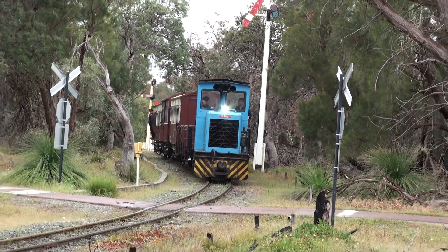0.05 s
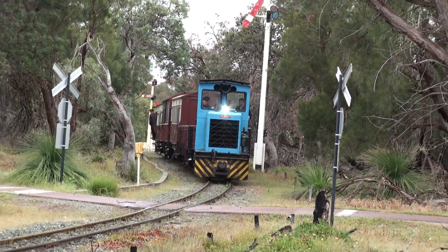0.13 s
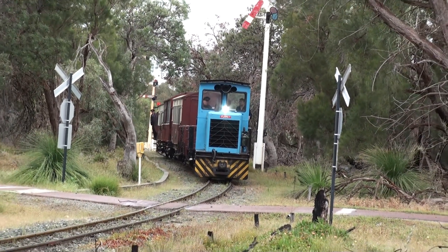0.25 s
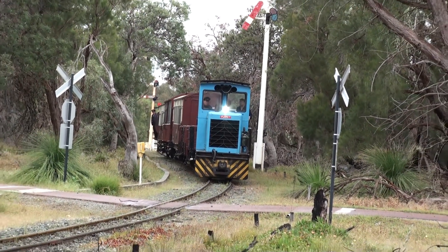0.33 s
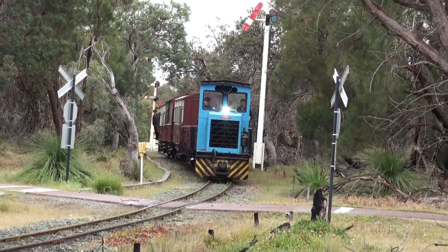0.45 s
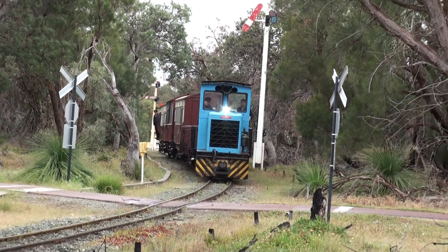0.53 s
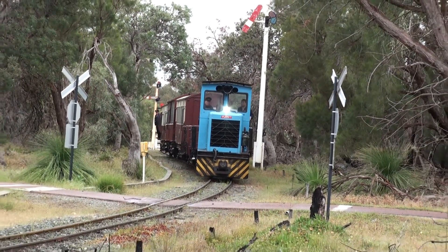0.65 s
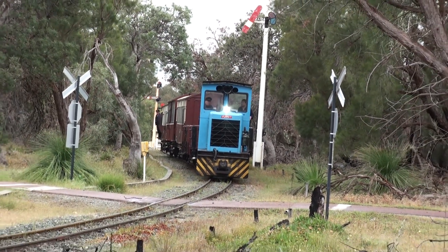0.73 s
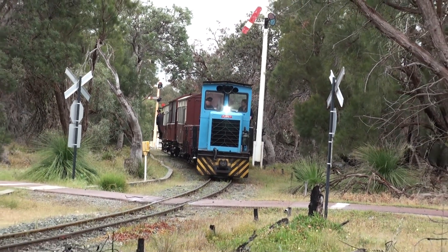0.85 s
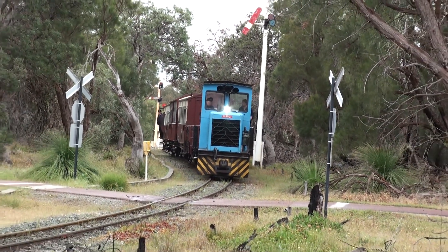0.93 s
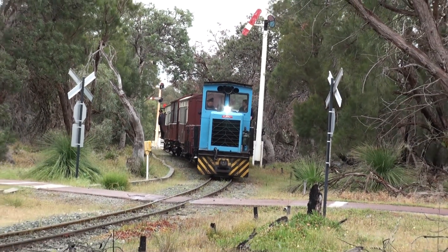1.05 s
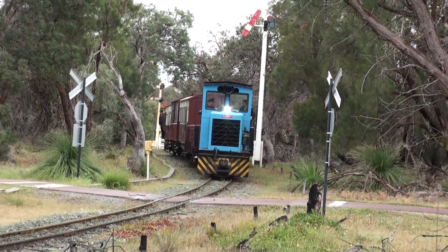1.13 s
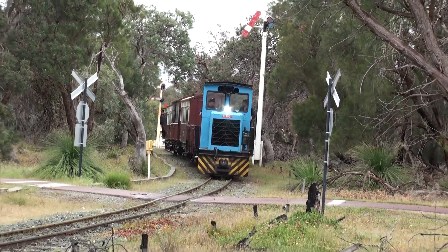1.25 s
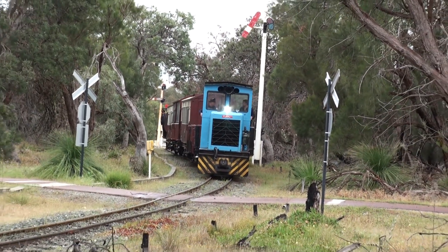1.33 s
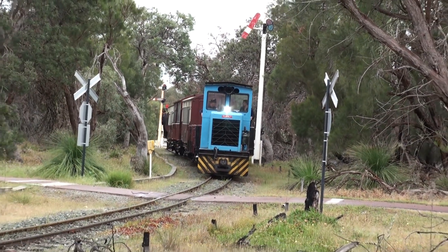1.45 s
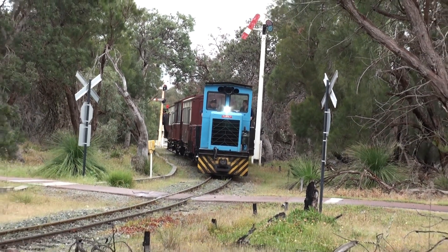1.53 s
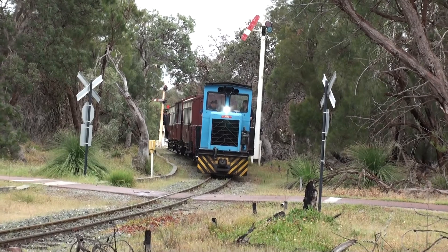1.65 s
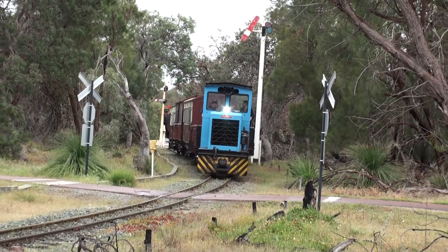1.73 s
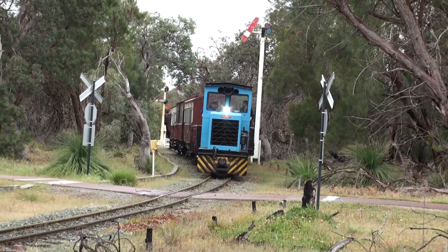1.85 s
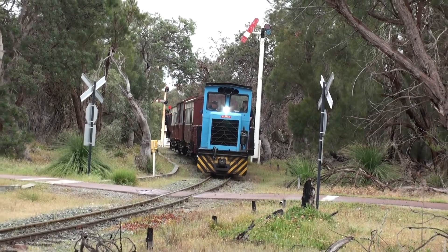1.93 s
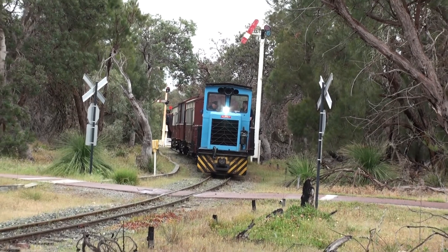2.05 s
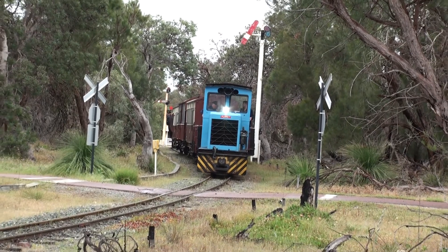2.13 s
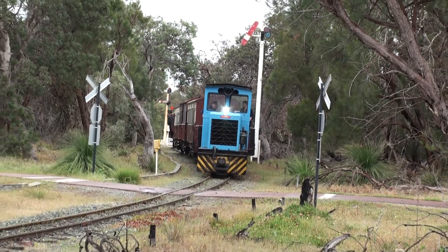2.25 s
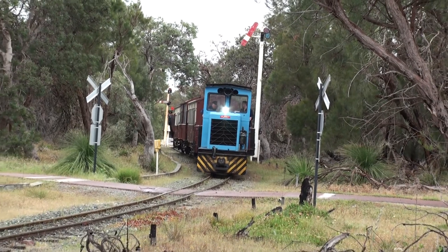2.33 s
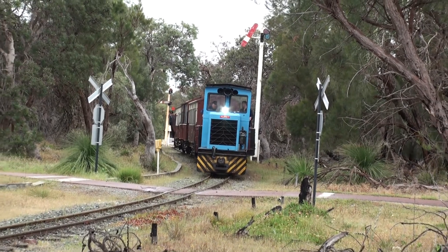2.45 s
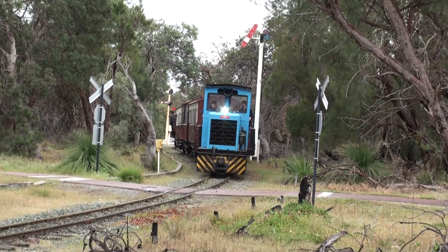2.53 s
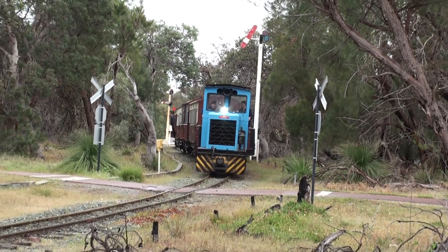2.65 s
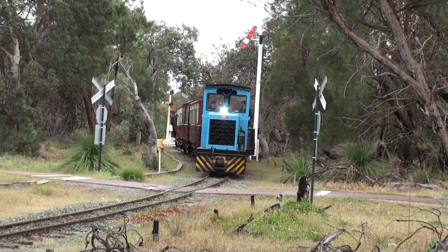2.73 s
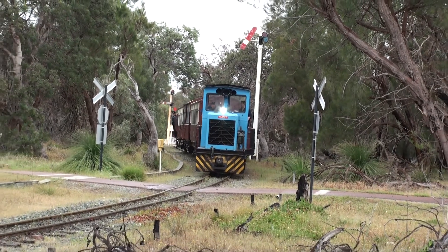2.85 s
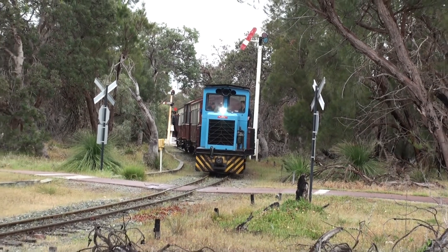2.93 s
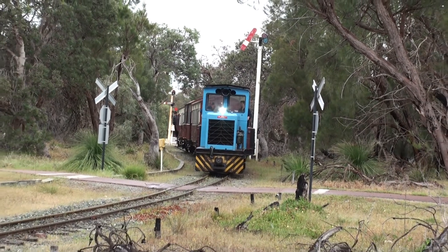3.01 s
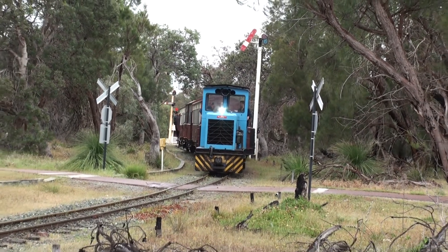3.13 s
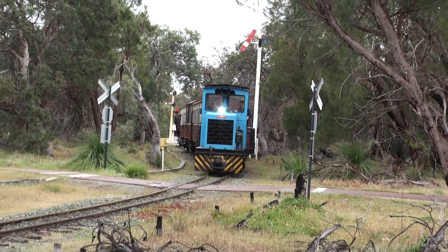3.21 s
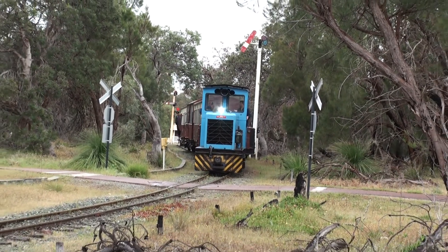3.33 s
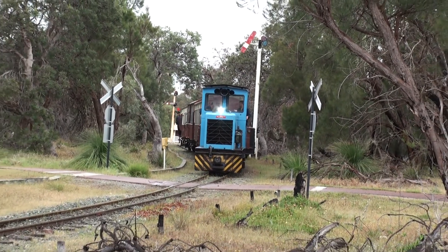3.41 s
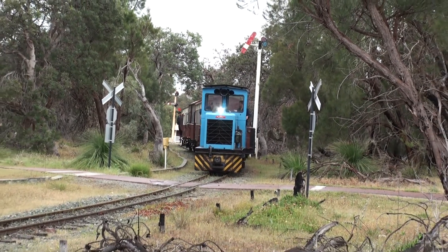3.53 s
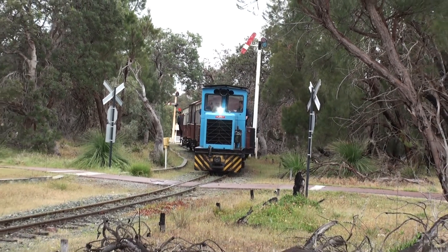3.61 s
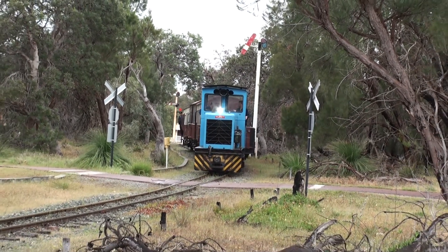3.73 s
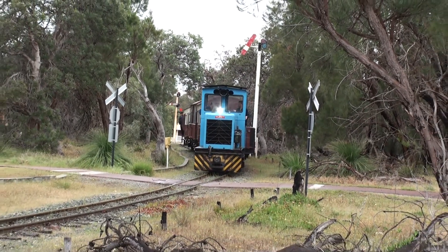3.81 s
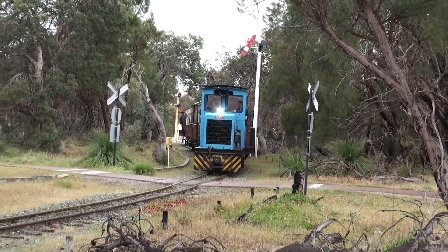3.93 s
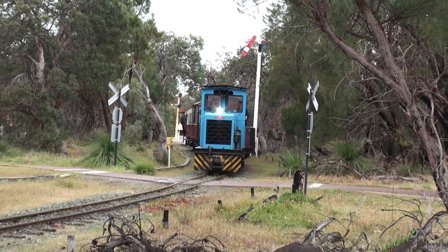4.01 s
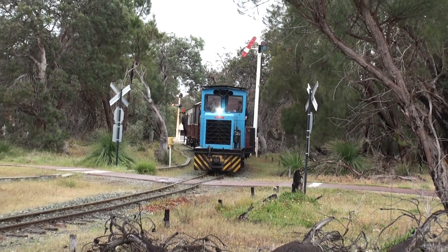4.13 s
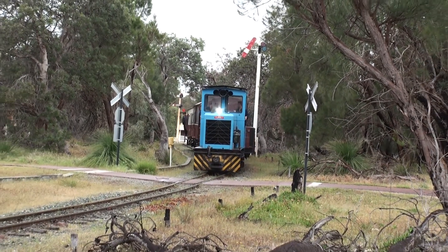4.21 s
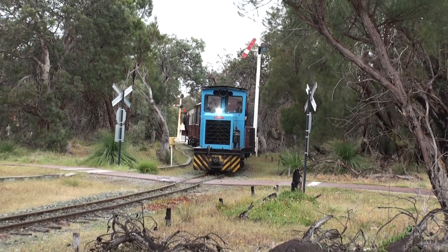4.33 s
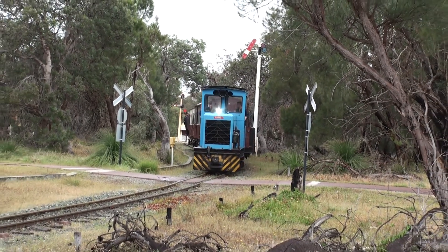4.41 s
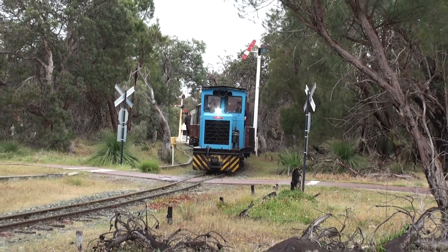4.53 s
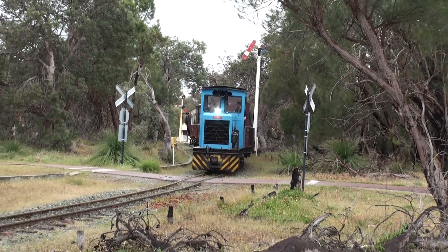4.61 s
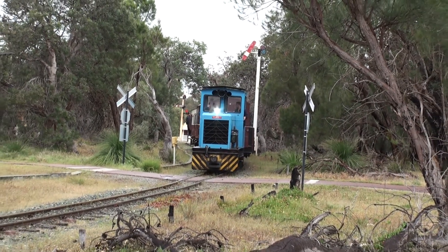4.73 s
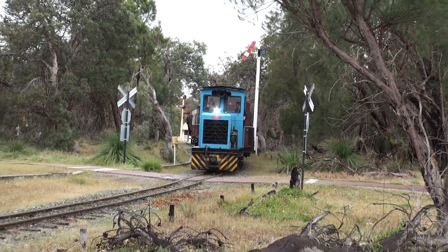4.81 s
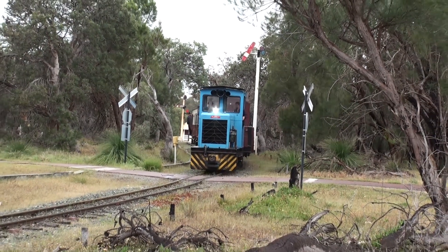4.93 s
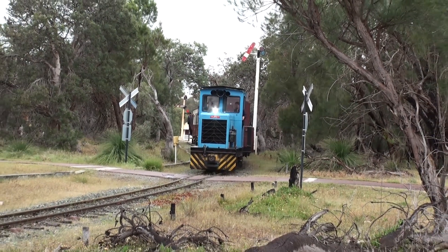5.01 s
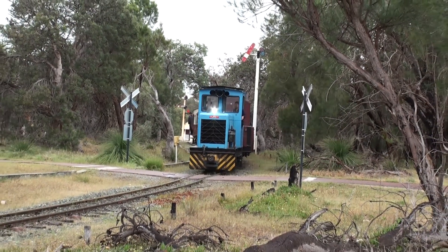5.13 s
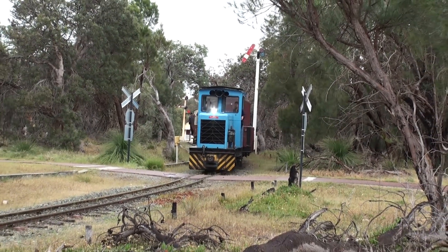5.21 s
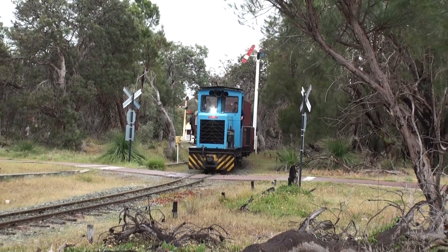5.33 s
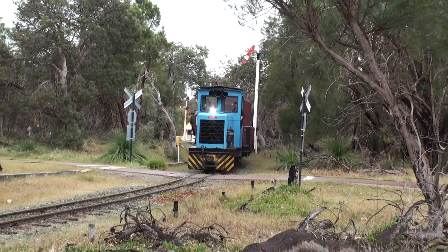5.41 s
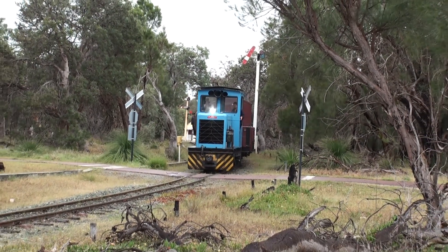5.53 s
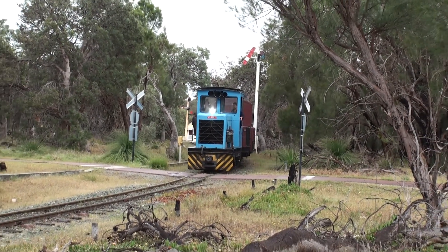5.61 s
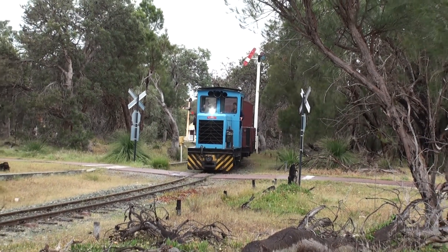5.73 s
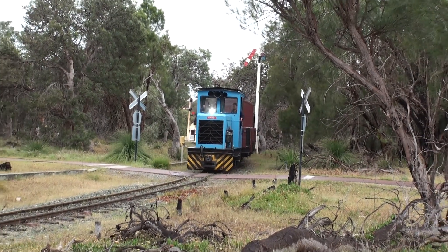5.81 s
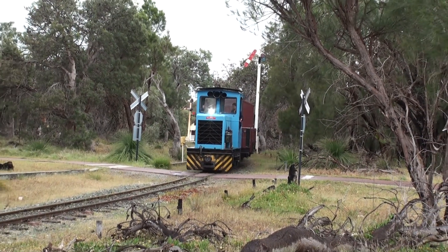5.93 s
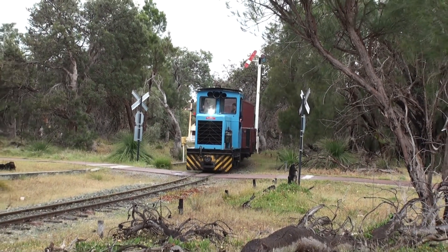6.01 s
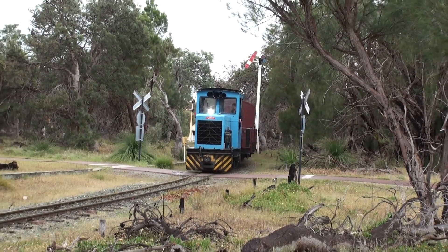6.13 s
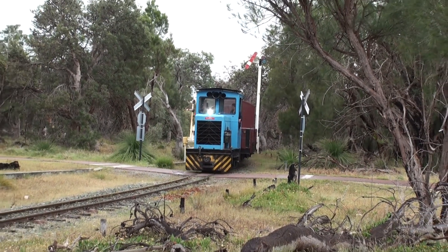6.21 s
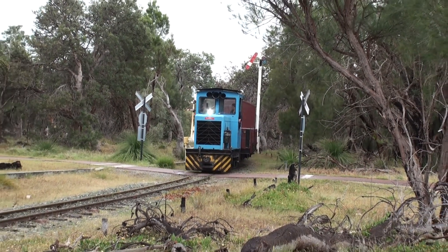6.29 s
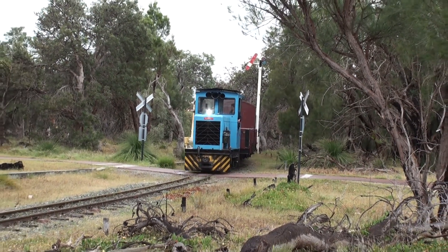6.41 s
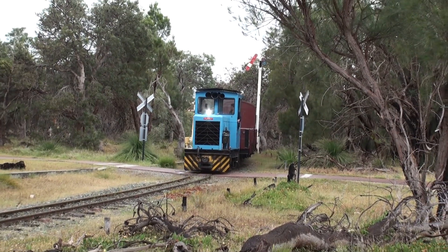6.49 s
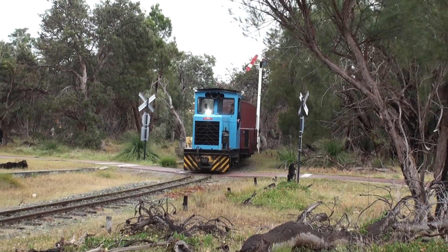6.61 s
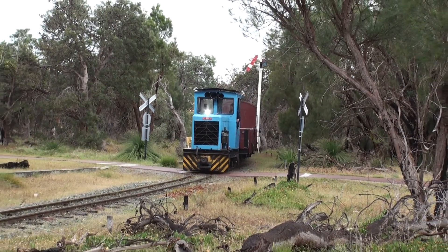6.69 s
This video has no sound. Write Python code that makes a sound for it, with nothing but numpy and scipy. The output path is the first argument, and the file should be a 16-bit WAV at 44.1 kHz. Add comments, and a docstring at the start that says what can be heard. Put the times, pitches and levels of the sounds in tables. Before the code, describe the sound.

The tail of a blaring locomotive horn chord stops and rings through woodland, leaving a low diesel hum, roar and hiss gradually rising, dotted with dry clicks.

```python
"""Diesel locomotive and air horn among trees

A small six-cylinder diesel rolls towards a level crossing: a drone of exhaust orders, with noise for rumble,
roar and hiss. Its four-trumpet air horn, summed from overtones, is already blowing, stops, and echoes off
the trees. The camera's gain control, knocked down by the blast, creeps back, so drone, roar, hiss, dry ticks
(filtered clicks) and thin squeaks (short sine chirps) swell steadily."""
import sys
import numpy as np
from scipy import signal
from scipy.fft import rfft, irfft, next_fast_len
from scipy.io import wavfile
from scipy.ndimage import uniform_filter1d

SR = 44100
rng = np.random.default_rng(int(sys.argv[2]) if len(sys.argv) > 2 else 0)


def to_wav(sig):
    """Store sig (one row per channel, or 1-D mono) as 16-bit WAV at the path in sys.argv[1].

    Samples outside -1..1 are clipped; the rate is SR.
    """
    pcm = np.clip(np.atleast_2d(sig), -1, 1) * 32767
    pcm = np.round(pcm).astype(np.int16)
    wavfile.write(sys.argv[1], SR, pcm.T)  # frames by channels


def volts_from_decibels(level):
    """Turn decibel levels (scalar or array-like) into linear amplitude factors."""
    exponent = np.asarray(level, float) / 20
    return 10 ** exponent


N = 298116

# phase lead of the left microphone port over the right: pitch_hz, lead_rad
LEAD = [(50, -.35), (99, -.28), (150, -.6), (300, -.8), (450, -.55), (900, -.75), (1200, -.47),
        (1870, -.07), (2200, -.26), (3400, -.05), (6000, 0.0), (7800, .4), (9000, -.07), (11800, 0.0)]


def evened(x):
    """Scales to rms 1."""
    return x / np.sqrt(np.mean(x ** 2) + 1e-20)


def read(points, hz):
    """Reads a table on a log-frequency axis."""
    f, value = np.transpose(points)
    return np.interp(np.log(hz + 1), np.log(f + 1), value)


def track(rows, t):
    """Reads the columns of a time table at times t."""
    s, *columns = np.transpose(rows)
    return [np.interp(t, s, c) for c in columns]


def drift(hz, size=N):
    """Slow chance up to about hz (at most 300), rms 1, drawn every 64 samples."""
    lowpass = signal.butter(2, min(hz, 300), fs=SR / 64, output="sos")
    slow = signal.sosfilt(lowpass, rng.standard_normal(size // 64 + 700))[698:]  # past the filter's start
    return np.interp(np.arange(size) / 64, np.arange(len(slow)), evened(slow))


def noise(far, near, patchy_db, size, ringing=()):
    """Two-channel noise, rms 1, whose colour moves from far to near, with drifting patches."""
    # likeness of left and right: pitch_hz, likeness (1 = identical)
    likeness = [(60, 1), (300, 1), (400, 0.86), (550, 0.9), (950, 0.95), (1900, 0.96), (2200, 0.93),
                (4500, 0.98), (7000, 0.96), (8000, 0.75), (9500, 0.91), (11800, 0.99)]
    hop = size // 4
    frames, hz = N // hop + 5, np.fft.rfftfreq(size, 1 / SR)
    a, b, c, d, patches = rng.standard_normal((frames, len(hz), 5)).T
    patches = uniform_filter1d(patches, size=size // 128, axis=0)
    patches = evened(uniform_filter1d(patches, size=3000 // hop + 2, axis=1))
    same = np.clip(read(likeness, hz), -1, 1)[:, None]
    left, other = a + 1j * b, c + 1j * d
    z = np.array([left, same * left + np.sqrt(1 - same ** 2) * other])

    far_colour, near_colour = [volts_from_decibels(read(p, hz)) / np.linalg.norm(volts_from_decibels(read(p, hz))) for p in (far, near)]
    nearness = np.clip((np.arange(frames) * hop / SR - 2.2) / 4.64, 0, 1)  # the approach starts at 2.2 s
    z *= far_colour[:, None] ** (1 - nearness) * near_colour[:, None] ** nearness
    z *= volts_from_decibels(patchy_db * patches)
    ring_db = sum(db / (1 + (2 * (hz - f) / width) ** 2) for f, width, db in ringing) + 0 * hz
    z *= volts_from_decibels(ring_db)[:, None]
    return evened(signal.istft(z, nperseg=size, noverlap=size - hop)[1][:, :N])


def engine():
    """Exhaust orders of the four-stroke cycle over low rumble, and roar and hiss that throb with the firing."""
    # exhaust note; six cylinders fire on every sixth order of the cycle: order, level_db
    exhaust = [(4, -28), (6, -9), (9, -26), (10, -19), (11, -14), (12, 0), (13, -18), (14, -20), (15, -25),
               (16, -21), (17, -29), (18, -8), (19, -14), (20, -23), (21, -11), (22, -19), (23, -17),
               (24, -27), (25, -29), (27, -23), (28, -18), (29, -21), (30, -24), (32, -27), (33, -27),
               (34, -18), (35, -28), (36, -29), (37, -27), (38, -20), (39, -20), (42, -30), (60, -27)]
    # a belt-driven fan sings between the orders: order, level_db
    fan = [(39.5, -12.5), (59.25, -29)]
    # engine speed and levels: time_s, twelfth_order_hz, note_db, roar_db
    speed = [(0, 99.5, -17.5, -22.5), (.65, 99.5, -20, -25), (1.05, 99.5, -21, -22),
             (1.65, 99.07, -21.5, -23), (2.55, 99.09, -22, -23), (3.45, 98.77, -22, -23),
             (4.05, 99.2, -21.5, -23), (4.65, 99.33, -21, -23), (5.55, 99.76, -21.5, -23),
             (5.9, 99.23, -21, -23), (6.2, 98.4, -22.5, -23.2), (6.62, 97.35, -21.8, -22),
             (6.76, 98.0, -21, -22)]
    # the exhaust swings aside: time_s, factor on the left-right lead
    bearing = [(0, 1.2), (.85, 0.11), (3, 0.52), (5.3, 1.8), (6.76, 1.6)]
    # relative colour of the low rumble: pitch_hz, density_db_per_hz
    rumble_colour = [(20, -45), (32, -26), (60, -39), (95, -13.5), (150, -11.5), (240, -13), (300, -15.5),
                     (340, -19), (400, -32.5), (520, -59)]
    # casing roar, notched by the ground echo, from far and from near: pitch_hz, density_db_per_hz
    roar_far = [(200, -52), (340, -13.5), (350, -12), (398, -14.5), (471, -13), (515, -8.5), (672, -2.5),
                (756, -2.5), (904, -1), (1090, -8.5), (1240, -0.5), (1820, -10.5), (2110, -10), (2290, -12),
                (3600, -22.5), (4680, -57), (7920, -120)]
    roar_near = [(200, -35), (340, -5), (357, -24), (398, -17.5), (552, -3.5), (779, -2.5), (959, 1),
                 (1130, -8.5), (1380, -2), (1680, -14), (2130, -15.5), (2330, -17.5), (2950, -20.5),
                 (3200, -27.5), (3600, -19.5), (4680, -43), (7920, -120)]
    # relative colour of the hiss: pitch_hz, density_db_per_hz
    hiss_colour = [(2000, -47), (3000, 1), (3220, -13), (3700, -3), (4280, -1), (4650, -4), (5610, -2.5),
                   (5890, -7.5), (6360, -2.5), (7010, -7.5), (7990, -9), (11000, -13), (12300, -21),
                   (13200, -24), (14300, -23), (16000, -32)]
    # narrow ringing of the casing: pitch_hz, width_hz, lift_db
    casing = [(2105, 23, 8), (2560, 56, 4.5), (2760, 39, 3), (5900, 140, -0.5), (7050, 190, 6),
              (11860, 290, 11.5)]

    t = np.arange(N) / SR
    hz, note_db, roar_db = track(speed, t)
    hiss_db = -33 - 0.51 * t  # the treble dims as the body turns side-on
    cycle = 2 * np.pi * np.cumsum(hz / 12) / SR
    aside = (track(bearing, t)[0] - 1) / 2 * np.array([[1], [-1]])

    note = np.zeros((2, N))
    orders = exhaust + fan
    for (k, db), chance in zip(orders, rng.random(len(orders))):
        # firing orders lock into one pulse smeared by the pipe; the rest come from unequal cylinders
        phase = .52 * (k / 6) ** 2 if k % 6 == 0 else 2 * np.pi * chance
        if k in (11, 13):  # uneven firing times: these wobble the main hum in pitch, not in level
            phase = .52 * 4 + np.pi / 2
        waver_db = (.02 * k + .4) * drift(5.0)  # uneven burning from cycle to cycle
        lead = aside * read(LEAD, k * hz[0] / 12)
        note += volts_from_decibels(db + waver_db) * np.sqrt(2) * np.cos(k * cycle + phase + lead)

    firing = np.cos(6 * cycle)
    crank = np.cos(2 * cycle) + np.cos(3 * cycle)
    roar_db = roar_db + 0.16 * firing + 0.1 * crank + 0.73 * drift(30.0)
    hiss_db = hiss_db + 0.54 * firing + .5 * crank + 0.39 * drift(62.6)
    rumble = volts_from_decibels(note_db - 8.5) * noise(rumble_colour, rumble_colour, 1.5, 4096, casing)
    roar = volts_from_decibels(roar_db) * noise(roar_far, roar_near, 0.58, 1024, casing)
    hiss = volts_from_decibels(hiss_db) * noise(hiss_colour, hiss_colour, 0.45, 512, casing)
    return (volts_from_decibels(note_db) * note + rumble + roar + hiss) * volts_from_decibels(-0.8 * aside)


def horn():
    """Four reed trumpets on one air valve, with rushing air, heard directly and off the trees."""
    # pitch of each trumpet while the air lasts: pitch_hz
    trumpet_hz = [258.4, 313.85, 374.55, 538.0]
    # one list for each trumpet: multiple, level_db
    trumpet_overtones = [
        [(1, -29.5), (2, -35.5), (3, -28.5), (4, -30.5), (5, -26.5), (6, -31), (7, -31.5), (8, -30), (9, -45),
         (10, -42), (11, -37), (12, -53), (13, -55), (14, -45), (15, -42), (16, -44), (17, -50), (18, -61),
         (19, -53), (20, -64)],
        [(1, -23.5), (2, -31.5), (3, -25.5), (4, -24.5), (5, -27.5), (6, -42), (7, -21.5), (8, -35), (9, -43),
         (10, -42), (11, -38), (12, -41), (13, -46), (14, -47), (15, -56), (16, -58), (17, -63), (18, -57),
         (19, -65), (20, -61), (21, -63), (22, -55)],
        [(1, -32), (2, -28), (3, -34), (4, -24), (5, -22.5), (6, -40), (7, -52), (8, -33), (9, -37),
         (10, -40.5), (11, -51), (12, -61), (13, -53), (14, -65), (15, -54), (16, -65), (17, -53), (18, -56),
         (19, -59), (20, -53)],
        [(1, -24), (2, -32), (3, -40), (4, -30), (5, -43), (6, -40), (7, -62), (8, -51), (9, -60), (10, -68),
         (11, -67), (12, -54), (13, -63)],
    ]
    # colour of the sum tones: pitch_hz, level_db
    sum_tones = [(700, -39), (840, -37), (1150, -43), (1460, -35), (1780, -38), (2100, -37), (2450, -44),
                 (2730, -42), (3400, -50)]
    # relative colour of the rushing air: pitch_hz, density_db_per_hz
    air_colour = [(120, -32), (200, -12.5), (310, -10), (454, -14), (534, -4), (677, -10), (755, -8),
                  (1540, -3), (1710, -11.5), (2210, 1.5), (2380, -6), (10000, -29.5), (15500, -46)]
    difference_db = -4  # difference tones against the same colour

    t = np.arange(-SR, SR) / SR  # the blast began earlier, so the echoes are already full
    blow_db = blowing(t)
    slack = np.clip(1 - 4.1 * (t - 0.6), .5, 1)  # the reeds go flat once the air is nearly gone
    turns = []
    for hz in trumpet_hz:
        wavering_hz = hz * slack * (1 + 0.00036 * drift(16.0, size=len(t)))
        turns.append(2 * np.pi * (np.cumsum(wavering_hz) / SR + rng.random()))

    chord = np.zeros(len(t))
    ring_db = blowing(t - .03) - blow_db  # the long bells hold their lowest note a little longer
    for turn, overtones in zip(turns, trumpet_overtones):
        for k, db in overtones:
            level_db = db + ring_db * (k == 1) + 1.03 * drift(10.6, size=len(t))
            chord += volts_from_decibels(level_db) * np.cos(k * turn + .3 * k * k)
    # the second trumpet is shaken by its neighbours' tones near 530 Hz
    shakes = ((2 * turns[0], 2 * trumpet_hz[0]), (turns[3], trumpet_hz[3]))
    for k in range(1, 10):
        second_hz = k * trumpet_hz[1]
        for shake, hz in shakes:
            chord += volts_from_decibels(read(sum_tones, second_hz + hz)) * np.cos(k * turns[1] + shake)
            if k > 3:
                level_db = read(sum_tones, second_hz - hz) + difference_db
                chord += volts_from_decibels(level_db) * np.cos(k * turns[1] - shake + k)
    chord *= np.sqrt(2) * volts_from_decibels(blow_db)

    now = np.arange(N) / SR
    rasp_db = 5.0 * np.exp(-((now - .53) / .02) ** 2)  # the reeds rattle as the valve shuts
    air = volts_from_decibels(-21.5 + blowing(now) + rasp_db) * noise(air_colour, air_colour, 2.0, 1024)
    # half a second of air, mirrored and then forwards, fills the second before the start
    long_air = np.concatenate([air[0, SR // 2::-1], air[0, 1:SR // 2], air[0, :SR]])
    out = np.zeros((2, N + SR))
    out[:, :len(t)] += chord
    echoes = trees(volts_from_decibels(-1.5) * chord + volts_from_decibels(3.0) * long_air)
    out[:, :echoes.shape[1]] += echoes
    return out[:, SR:] + air


def blowing(t):
    """Blowing pressure in dB: sags as the air tank empties, then collapses as the valve shuts."""
    shut_s, knee_s = 0.53, 0.0071
    sag_db = 6 * np.clip(t, 0, shut_s)
    release_db = 490.0 * knee_s * np.logaddexp(0, (t - shut_s) / knee_s)  # settles to 490 dB per s
    return 33 - sag_db - release_db


def trees(x):
    """Sparse echoes of random sign: a quick answer from near trunks and cars, a long faint one from far trunks."""
    # decay of the far trunks: pitch_hz, t60_s
    far_t60 = [(250, 0.87), (320, 0.69), (375, 4.44), (450, 0.78), (540, 2.35), (630, 2.7), (1000, 2.1),
               (2000, 1.06), (4000, 1.08), (9000, 0.41)]
    near_t60_s, near_db, far_db = 0.23, -19, -25.5
    taps = np.zeros((2, 2 * SR))
    at = np.arange(900, 2 * SR - 20, 20) + rng.integers(0, 20, (2, (2 * SR - 901) // 20))
    np.put_along_axis(taps, at, rng.choice([-1., 1.], at.shape), 1)
    taps[1] = 0.54 * taps[0] + 0.5 * taps[1]  # the sides share part of their echoes

    hz, t, z = signal.stft(taps, SR, nperseg=2048)
    fade = volts_from_decibels(-60 * t / np.maximum(read(far_t60, hz), .05)[:, None])
    far = signal.istft(z * fade, SR, nperseg=2048)[1][:, :2 * SR]
    near = taps * volts_from_decibels(-np.arange(2 * SR) / SR * 60 / near_t60_s)
    near = signal.sosfilt(signal.butter(1, 1800, fs=SR, output="sos"), near)  # leaves soak up the treble
    tail = volts_from_decibels(far_db) * far / np.linalg.norm(far[0]) + volts_from_decibels(near_db) * near / np.linalg.norm(near[0])
    return signal.fftconvolve(x[None], tail, axes=1)


def ticks():
    """Short bright snaps: placed ones over a sparse random scatter."""
    # dry ticks: start_s, peak_db, left_over_right_db, low_edge_hz
    placed = [(1.269, -7, 2, 1820), (1.6013, -14, -2.0, 1800), (2.2807, -16, -4, 1800),
              (2.7465, -14.5, -0.5, 1800), (2.8838, -18, -1.5, 1800), (3.8764, -21, -1.0, 1800),
              (4.0261, -10.5, -6, 1800), (4.8124, -16, 0.0, 1800), (5.9294, -23, -1.0, 1800),
              (5.9945, -12, -6, 3600), (6.0284, -23, -0.5, 1800), (6.639, -14, 2, 1800)]
    size = volts_from_decibels(-32.0 + 4.0 * np.minimum(rng.exponential(1, N), 4))
    struck = rng.random(N) < 12.0 / SR  # about 12 per second
    scatter = signal.oaconvolve(size * struck, snap(1800.0))[:N]
    out = np.array([scatter, scatter])
    for s, db, pan_db, low_hz in placed:
        sides = volts_from_decibels(np.array([[db + pan_db / 2], [db - pan_db / 2]]))
        out[:, round(s * SR):][:, :300] += sides * snap(low_hz)
    return out


def snap(low_hz):
    """One sharp crack with a millisecond of rattle, band-passed and scaled to peak 1."""
    t = np.arange(300) / SR
    band = signal.butter(1, [low_hz, 2.8 * low_hz], "bandpass", fs=SR, output="sos")
    rattle = 0.34 * rng.standard_normal(len(t)) * np.exp(-t / 0.0013)
    crack = signal.sosfilt(band, (t == 0) + rattle)
    return crack / abs(crack).max()


def squeaks():
    """Brief high chirps, roughened in pitch, that start sharply, sag and fade."""
    # thin squeaks: start_s, level_db, pitch_hz
    chirps = [(2.0502, -39.5, 10700), (3.1158, -42, 11000), (3.635, -35, 10900), (4.7496, -38, 10400),
              (5.177, -40, 10500), (5.446, -38, 10200), (6.228, -35, 10200)]
    out = np.zeros(N)
    for s, db, hz in chirps:
        u = np.linspace(0, 1, round(0.034 * SR))  # each lasts 34 ms
        turns = np.cumsum(hz * (1.005 - .012 * u + .03 * rng.standard_normal(len(u)))) / SR
        shape = np.minimum(u / 0.087, 1) * np.exp(-1.5 * u) * np.minimum((1 - u) / .1, 1)
        out[round(s * SR):][:len(u)] += volts_from_decibels(db) * shape * np.sin(2 * np.pi * turns)
    return out


def scene():
    """All sources, two channels."""
    return engine() + horn() + ticks() + squeaks()


def held_excess(x, from_db, most_db, recovery_db_per_s):
    """How far the level of x exceeds from_db, caught at once and let go at a steady rate."""
    power_db = 10 * np.log10(abs(uniform_filter1d((x ** 2).mean(0), size=1800)) + 1e-12)
    fall = np.arange(N) * recovery_db_per_s / SR
    over_db = np.maximum.accumulate(np.minimum(power_db - from_db, most_db) + fall) - fall
    return uniform_filter1d(np.maximum(over_db, 0), size=400)


def roll_off(x):
    """The treble ends steeply here."""
    return signal.sosfilt(signal.butter(12, 16470, fs=SR, output="sos"), x)


def record(dry):
    """Slow gain control and a quick limiter hold the horn down; a close pair of ports sets phase and level."""
    # balance of the microphone ports: pitch_hz, left_over_right_db
    balance = [(50, 1.3), (99, -1.3), (170, -.7), (330, -1.6), (540, .3), (750, -.1), (1100, -1.8),
               (1500, -2.3), (2200, -1.7), (3400, -.6), (4500, -2.1), (6000, -.8), (7000, -2.4),
               (9000, 2.6), (10500, .3)]
    # steep treble cutoff above about 14.5 kHz: pitch_hz, level_db
    treble_cutoff = [(20, 0), (14350, 0), (14700, -22), (15700, -30), (16000, -70)]
    levelled = dry / volts_from_decibels(held_excess(dry, from_db=-12.5, most_db=23.5, recovery_db_per_s=4.5))
    limiting_db = .72 * held_excess(levelled, from_db=-15.5, most_db=40, recovery_db_per_s=90.)
    held = levelled / volts_from_decibels(limiting_db)
    size = next_fast_len(N + 4096)
    hz = np.fft.rfftfreq(size, 1 / SR)
    half = volts_from_decibels(read(balance, hz) / 2) * np.exp(.5j * read(LEAD, hz))  # each side takes half the difference
    ports = irfft(rfft(held, size) * [half, 1 / half] * volts_from_decibels(read(treble_cutoff, hz)), size)[:, :N]
    return roll_off(np.clip(ports, -1, 1))


dry = scene()
out = record(dry)
to_wav(out)
```